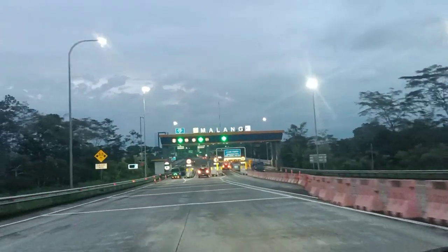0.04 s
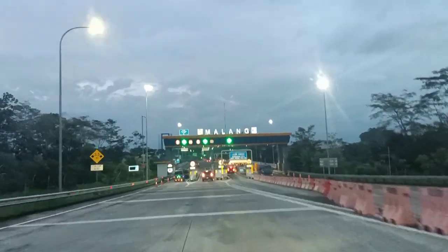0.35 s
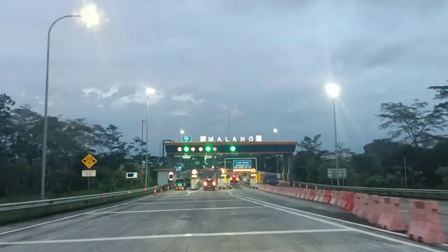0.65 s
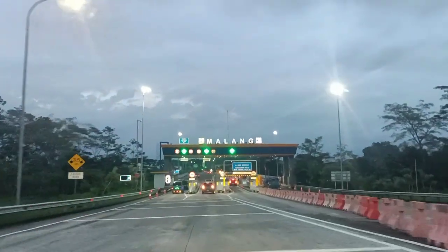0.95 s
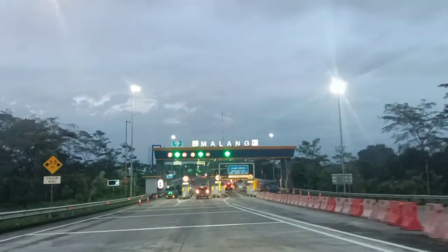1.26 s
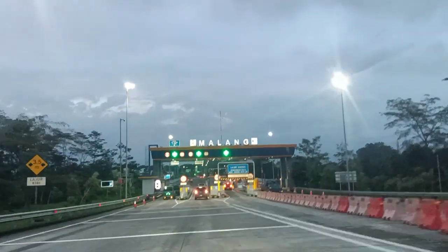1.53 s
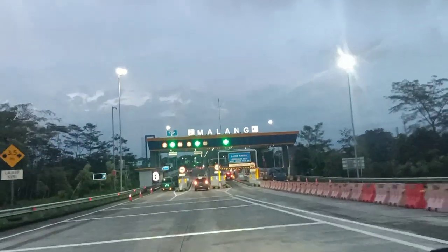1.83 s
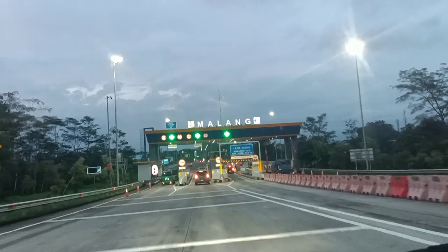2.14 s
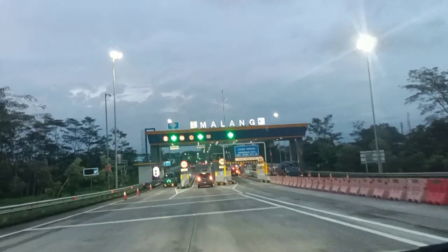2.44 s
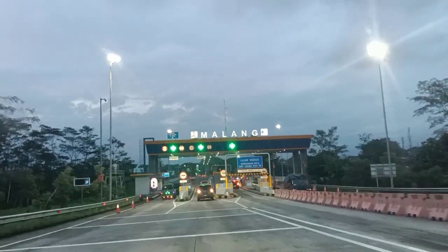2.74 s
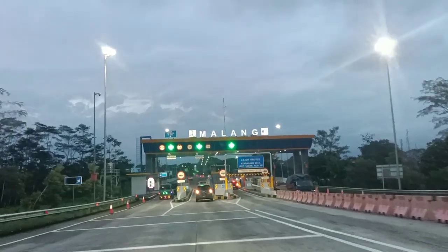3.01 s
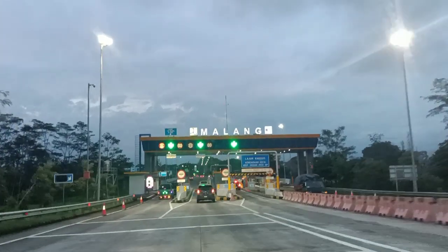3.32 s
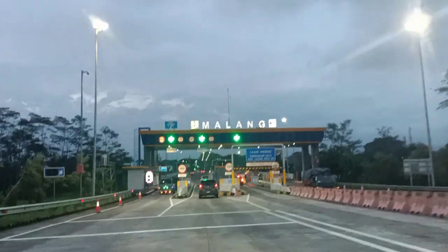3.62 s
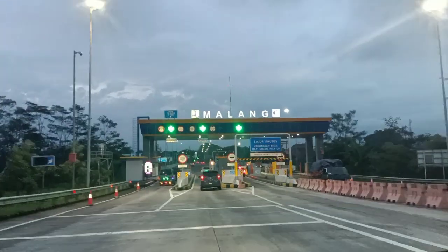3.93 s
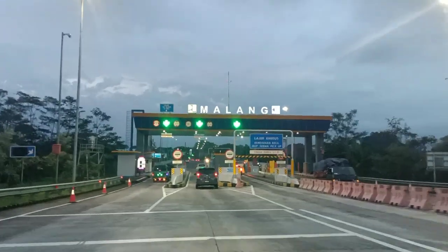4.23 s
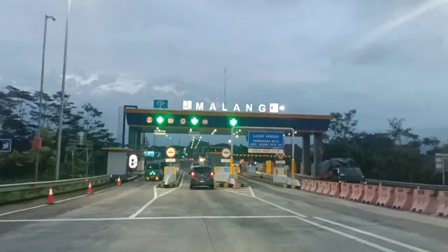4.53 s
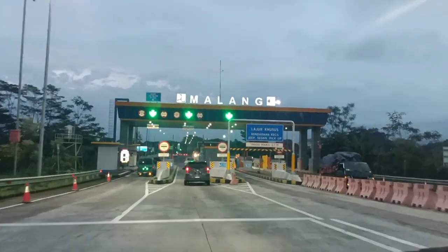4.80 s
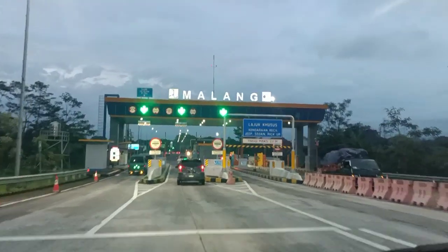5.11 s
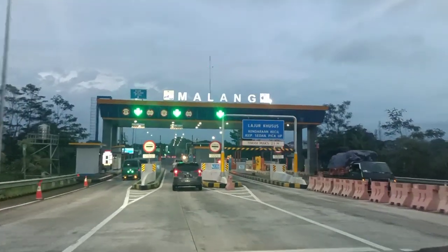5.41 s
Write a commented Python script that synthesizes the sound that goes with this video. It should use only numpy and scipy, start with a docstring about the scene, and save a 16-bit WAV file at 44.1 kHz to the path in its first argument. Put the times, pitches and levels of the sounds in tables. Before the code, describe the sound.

A deep road rumble fills the cabin of a car throughout, easing slightly as it slows, with a faint tyre hum sinking in pitch. The tyres cross sets of raised strips, front wheels then rear, each axle making a quick burst of about three dull, heavy thumps. These pairs come at about 0.4 and 0.7 seconds, 1.7 and 2.1, 3.1 and 3.4, then 4.3 and 4.7. One lighter burst follows at about 5.4 seconds. Every crossing booms through the body and sets loose plastic trim clacking and chattering close to the microphone. The rear wheel crossings add a brief, brighter rattle of small loose things. Between the jolts the rumble carries on with faint ticks from the trim, and a very faint drivetrain whine comes and goes from around 3 to 5 seconds.

```python
"""Car crossing raised strips

Inside a car slowing on concrete, the road rumbles, the tread hums lower and lower, the drivetrain
whines faintly and the trim ticks. Front axle, then rear, crosses sets of three raised strips.
The tyres slap the strips, heave the body, thud in the floor pan and drum the cabin air.
Each crossing throws loose plastic trim up, to clack and rattle."""
import sys
import numpy as np
from scipy import signal
from scipy.fft import rfft, irfft, next_fast_len
from scipy.io import wavfile
from scipy.ndimage import uniform_filter1d, minimum_filter1d, map_coordinates

SR = 44100
rng = np.random.default_rng(int(sys.argv[2]) if len(sys.argv) > 2 else 0)


def store_wav(level_fs):
    """Save 16-bit WAV to argv[1]."""
    pcm = np.round(np.clip(np.atleast_2d(level_fs), -1, 1) * 32767)
    wavfile.write(sys.argv[1], SR, pcm.T.astype(np.int16))


N = 249606
TIME_S = np.arange(N) / SR
AGE_S = np.arange(SR // 2) / SR  # time since a blow


def amp(db):
    """Decibels to gain."""
    return 10 ** (np.asarray(db) / 20)


def unit(x):
    """x at rms 1."""
    return x / np.sqrt(np.mean(x ** 2) + 1e-20)


def along(points, hz):
    """(Hz, value) points read on a log axis."""
    knots_hz, values = np.transpose(points)
    return np.interp(np.log(hz + 1), np.log(knots_hz + 1), values)


def curves(rows):
    """One value per sample for each column after the time."""
    times_s, *columns = np.transpose(rows)
    return [np.interp(TIME_S, times_s, column) for column in columns]


def wobble(per_s):
    """A smooth random curve, per_s knots a second."""
    knots = rng.standard_normal(int(N * per_s / SR) + 4)
    return map_coordinates(knots, [TIME_S * per_s])


def ripple(hz, step_hz):
    """A random curve over frequency, a knot every step_hz."""
    knots = np.arange(0, SR / 2, step_hz)
    return np.interp(hz, knots, rng.standard_normal(len(knots)))


def filtered(x, response):
    """x times a response of frequency."""
    size = next_fast_len(N + SR // 2)
    return irfft(rfft(x, size) * response(np.fft.rfftfreq(size, 1 / SR)), size)[..., :N]


def add(track, start_s, sound):
    """Mix a sound into a track."""
    part = track[..., max(round(start_s * SR), 0):][..., :sound.shape[-1]]
    part += sound[..., :part.shape[-1]]


def swell(rise_s, t60_s):
    """A half-second envelope of peak 1: soft rise, exponential decay."""
    shape = (1 - np.exp(-(AGE_S / rise_s) ** 2)) * amp(-60 * AGE_S / t60_s)
    return shape / shape.max()


def contacts(per_s, spread_db, t60_s):
    """Envelope of rms 1 of many tiny contacts, each dying quickly."""
    hits = (rng.random(N) < per_s / SR) * amp(spread_db * rng.standard_normal(N)) ** 2
    power = signal.fftconvolve(hits, amp(-60 * AGE_S / t60_s) ** 2)[:N]
    return unit(np.sqrt(np.abs(power)))


# Each row: frequency in Hz, left-right correlation.
CORRELATION = [(60, 0.99), (130, 0.96), (290, 0.87), (640, 0.31), (1400, -0.35), (3100, 0.046),
               (15000, -0.086)]


def noise(spectrum):
    """Stereo noise of rms near 1, alike on both sides in the bass, unrelated in the treble."""
    def mid_and_side(hz):
        angle = np.arccos(np.clip(along(CORRELATION, hz), -1, 1)) / 2
        return amp(along(spectrum, hz)) * [np.cos(angle), np.sin(angle)]

    mid, side = filtered(rng.standard_normal((2, N)), mid_and_side)
    return np.array([mid + side, mid - side]) / np.sqrt(np.mean(mid ** 2))


# Each row: time in seconds, then relative shudder, boom, roar and rustle in dB.
ROAD_LEVELS = [(0.19, -24, -31.5, -39.5, -58.5), (1.15, -27.5, -35.5, -43, -65.5),
               (1.55, -24.5, -32.5, -43, -64), (2.52, -26.5, -34.5, -42.5, -62),
               (2.871, -35, -37.5, -42.5, -64), (4.02, -29, -34.3, -46.5, -66.5),
               (5.15, -34, -37.5, -48.5, -69)]
# Lift per crossing in dB: shudder, boom, roar, rustle.
UNSETTLED_LIFT_DB = [6, 6, 3.9, 4.7]


def road_levels():
    """Shudder, boom, roar and rustle in dB: sinking as the car slows, lifted at each crossing."""
    unsettled = np.zeros(N)
    lead_s = 0.051  # rough ground before the strips
    for start_s, *_ in CROSSINGS:
        add(unsettled, start_s - lead_s, swell(rise_s=0.091, t60_s=1.84))
    return [db + lift_db * unsettled for db, lift_db in zip(curves(ROAD_LEVELS), UNSETTLED_LIFT_DB)]


# Each row: frequency in Hz, relative density in dB.
SHUDDER_SPECTRUM = [(12, -23), (22, 0), (29, 7), (38, 2), (52, 1.5), (68, -25), (100, -66.5)]
ROAR_SPECTRUM = [(41, 4), (70, 2.5), (103, -4), (135, 0.5), (165, -3), (211, -1.5), (259, -11.5),
                 (294, -11), (411, -22), (467, -19.5), (524, -20), (566, -26.5), (842, -36), (1050, -34.5),
                 (1500, -50), (1950, -68), (3300, -120)]


def road():
    """Rough concrete shudders the body, booms in the cabin and roars through the tyres."""
    shudder_db, boom_db, roar_db, _ = road_levels()
    bumps_db = wobble(per_s=10)
    shudder = amp(shudder_db - 1.5 + bumps_db) * noise(SHUDDER_SPECTRUM)
    rolling = noise(ROAR_SPECTRUM)
    lows = filtered(rolling, lambda hz: 1 / (1 + (hz / 265) ** 8))
    boom = amp(boom_db + 3.26 + bumps_db) * unit(lows)
    roar = amp(roar_db + 0.07 + 0.5 * bumps_db) * unit(rolling - lows)
    return shudder + boom + roar


# Each row: time in seconds, pitch in Hz.
TREAD_PITCH = [(0, 535), (1.2, 467.7), (3, 450.8), (5.66, 441)]


def tread_hum():
    """Unevenly spaced tread blocks make a fuzzy hum that sinks with the speed."""
    hum_hz, = curves(TREAD_PITCH)
    _, _, roar_db, _ = road_levels()
    carrier = np.exp(2j * np.pi * np.cumsum(hum_hz) / SR)
    fuzz = wobble(per_s=24) + 1j * wobble(per_s=24)
    return amp(roar_db - 11) * unit((carrier * fuzz).real)


# Each row: time in seconds, level in dB.
WHINE_LEVELS = [(2.9, -97), (3.25, -65.5), (3.7, -82), (4.1, -70.5), (4.52, -67), (4.9, -88)]


def drivetrain_whine(start_hz=1236, sag_hz_per_s=9.3):
    """The drivetrain whines faintly as the car coasts."""
    whine_db, = curves(WHINE_LEVELS)
    whine_hz = start_hz - sag_hz_per_s * TIME_S + 9 * wobble(per_s=40)
    phase = 2 * np.pi * np.cumsum(whine_hz) / SR
    return amp(whine_db + 2.5 * wobble(per_s=14)) * np.sqrt(2) * np.sin(phase)


# Each row: frequency in Hz, relative density in dB.
RUSTLE_SPECTRUM = [(900, -28), (1500, -2), (1950, 0.5), (2400, 4), (2700, -4), (3100, -0.5), (3800, -6),
                   (5500, -4), (7000, -7.5), (8800, -9.5), (9800, -16), (15500, -19.5)]


def trim_rustle():
    """The running car keeps its trim faintly ticking."""
    *_, rustle_db = road_levels()
    ticks = contacts(per_s=500, spread_db=3.5, t60_s=0.08)
    return amp(rustle_db - 0.5) * ticks * noise(RUSTLE_SPECTRUM)


# Each row: start in seconds, relative level in dB.
PANEL_KNOCKS = [(2.788, -43.5)]
# Each row: frequency in Hz, relative density in dB.
PANEL_SPECTRUM = [(1100, -10), (1700, -8), (2300, 3), (2600, -9), (3100, -12), (4200, -31)]


def panel_knock():
    """A panel gives one short, dull knock."""
    level = np.zeros(N)
    for start_s, db in PANEL_KNOCKS:
        add(level, start_s, amp(db - 4) * swell(rise_s=0.0043, t60_s=0.07))
    return level * noise(PANEL_SPECTRUM)


# Each row: first clack in seconds, relative clack and surge levels in dB, fade per surge in dB.
RATTLES = [(0.428, -20.5, -37, 4), (0.694, -24.5, -39.5, 0.5), (1.771, -19.5, -34.5, 5),
           (2.087, -23.5, -37, 3), (3.111, -24.5, -40, 5), (3.455, -26, -35, 10), (4.313, -24, -42.5, 4),
           (4.692, -21.5, -36.5, 3), (5.396, -30, -43, 0.5)]
FRONT_RATTLES, REAR_RATTLES = RATTLES[::2], RATTLES[1::2]


def jolts(shape, lead_s, gap_s=0.062):
    """Three fading surges per crossing, starting lead_s before its first clack."""
    power = np.zeros(N)
    for start_s, _, surge_db, fade_db in RATTLES:
        for k in range(3):
            surge = amp(surge_db - fade_db * k) * shape
            add(power, start_s + k * gap_s - lead_s, surge ** 2)
    return np.sqrt(power)


# Each row: frequency in Hz, relative density in dB.
SIZZLE_SPECTRUM = [(2000, 6), (4500, -1), (6000, -2), (8500, -4.5), (10000, -2.5), (11300, -3.5),
                   (14200, -7), (15800, -32)]


def rear_sizzle(level_db=-47.5, rise_s=0.04, hold_s=0.15, t60_s=0.17):
    """Small loose things in the back rattle brightly while the rear axle bounces."""
    level = np.zeros(N)
    for start_s, *_ in REAR_RATTLES:
        age_s = TIME_S - start_s
        decay_db = 60 * np.maximum(age_s - hold_s, 0) / t60_s
        level += np.clip(age_s / rise_s, 0, 1) * amp(level_db - decay_db)
    return level * contacts(per_s=450, spread_db=3, t60_s=0.035) * noise(SIZZLE_SPECTRUM)


# Each row: frequency in Hz, relative density in dB.
TRIM_SPECTRUM = [(500, 5.5), (900, -1), (1130, 2), (1600, -4), (2210, 2.5), (3000, 0), (3700, -1.5),
                 (5400, 1.5), (7400, -5), (8800, -6.5), (9900, -15.5), (11000, -9.5), (14200, -18.5),
                 (15800, -21)]


def trim_chatter():
    """Jolted trim chatters after each strip."""
    shaken = jolts(swell(rise_s=0.032, t60_s=0.26), lead_s=0.023)
    ticks = contacts(per_s=700, spread_db=3, t60_s=0.035)
    return amp(-4.5) * shaken * ticks * noise(TRIM_SPECTRUM)


def clack(ring_hz, treble_db):
    """One plastic part strikes: a noise burst with uneven peaks and a resonance at ring_hz."""
    hz = np.fft.rfftfreq(len(AGE_S), 1 / SR)
    uneven_db = 3.8 * ripple(hz, step_hz=150)
    resonance_db = 5 / (1 + ((hz - ring_hz) / (0.12 * ring_hz)) ** 2)
    hardness_db = (treble_db + 25) * np.clip((hz - 3500) / 5000, 0, 1)  # harder is brighter
    colour = amp(along(TRIM_SPECTRUM, hz) + uneven_db + resonance_db + hardness_db)
    burst = irfft(rfft(rng.standard_normal((2, len(AGE_S)))) * colour, len(AGE_S))
    strike = swell(rise_s=0.0005, t60_s=0.049)
    window_echo = amp(-12.5) * swell(rise_s=0.011, t60_s=0.1)
    return unit(burst) * (strike + window_echo)


# Each row: delay in seconds, relative level in dB, ring in Hz, relative treble in dB.
FRONT_BOUNCES = [(0.0, -11.5, 2660, -17.5), (.059, 0, 2400, -22), (.109, -5.5, 2380, -28),
                 (.129, 0, 4700, -27), (.187, -6, 3500, -28)]
REAR_BOUNCES = [(0.0, -5.5, 5130, -17.5), (.063, 1.5, 2080, -22), (.145, -17.5, 4800, -8.5),
                (.211, -15, 2200, -15.5), (.296, -22.5, 2500, -20.5)]
# Each row: start in seconds, relative level in dB, ring in Hz, relative treble in dB.
SINGLE_CLACKS = [(0.2244, -44.5, 3390, -30), (0.5372, -28, 2120, -23), (0.8592, -32.5, 5100, -18),
                 (1.1278, -48.5, 1720, -32), (1.2521, -46, 3170, -30), (1.377, -49, 2250, -31),
                 (1.6114, -48.5, 1780, -23), (2.0437, -43.5, 3120, -30), (2.8729, -44, 2500, -24),
                 (3.1331, -33, 2500, -18), (3.2398, -35.5, 4850, -21), (4.0477, -51.5, 2470, -41),
                 (4.2024, -52, 2270, -24), (4.372, -28.5, 5450, -11.5)]


def trim_clacks():
    """Larger trim parts strike their seats: in one bounce pattern per axle, and singly."""
    out = np.zeros((2, N))
    for rattles, bounces in [(FRONT_RATTLES, FRONT_BOUNCES), (REAR_RATTLES, REAR_BOUNCES)]:
        for start_s, clack_db, *_ in rattles:
            for delay_s, db, ring_hz, treble_db in bounces:
                add(out, start_s + delay_s, amp(clack_db + db - 10.5) * clack(ring_hz, treble_db))
    for start_s, db, ring_hz, treble_db in SINGLE_CLACKS:
        add(out, start_s, amp(db - 4) * clack(ring_hz, treble_db))
    return out


def windscreen(x):
    """Reflections off the nearby glass give each side its own fine peaks and dips."""
    return filtered(x, lambda hz: amp([2.8 * ripple(hz, step_hz=70) for _ in range(2)]))


# Each row: start in seconds, strip gap in seconds, tyre flight in seconds, position of the hardest
# blow (strips 0-2), heave in dB, heave in Hz, thud in dB, drum in dB. Levels are relative.
CROSSINGS = [(0.411, 0.055, 0.032, 0.035, -4, 43.2, -17, -18.5),
             (0.669, 0.072, 0.046, 0.23, -2, 45, -29, -26.5),
             (1.747, 0.06, 0.00727, .7, -8.5, 30, -23.5, -21),
             (2.061, .064, .028, 0.97, -3, 36.4, -19.5, -17),
             (3.089, 0.057, 0.0038, 0.77, -14.5, 38.5, -16.5, -20.5),
             (3.432, 0.061, .022, 0.37, -3.5, 61, -12, -15),
             (4.285, .052, 0.0031, 0.64, -14.5, 38.85, -20, -28),
             (4.667, 0.066, 0.028, 0.33, -0.5, 33.3, -27, -25.5),
             (5.371, 0.06, 0.011, 0.73, -20.5, 53.3, -24, -24)]  # front and rear axle in turn


def strips(fall_db_per_strip=4):
    """Each meeting of an axle with a strip, weaker away from the hardest blow."""
    for start_s, gap_s, flight_s, hardest, *body_response in CROSSINGS:
        for k in range(3):
            meet_s = start_s + k * gap_s
            force_db = -fall_db_per_strip * abs(k - hardest)
            yield meet_s, meet_s + flight_s, force_db, *body_response


# Each row: frequency in Hz, relative density in dB.
SLAP_SPECTRUM = [(140, -34), (240, 1.5), (293, -12.5), (330, -7.5), (460, -6), (647, -19.5), (747, -14),
                 (855, -21), (1600, -27), (2080, -39), (3520, -120)]


def tread_slaps():
    """The tread slaps each strip and smacks down behind it: dull bursts through the wheel arches."""
    rolling = amp(2) * jolts(swell(rise_s=0.027, t60_s=0.33), lead_s=0.038)
    smack = swell(rise_s=0.0058, t60_s=0.08)
    landing = np.zeros(N)
    for _, land_s, force_db, _, _, thud_db, _ in strips():
        add(landing, land_s, amp(thud_db + force_db - 13.5) * smack)
    return np.hypot(rolling, landing) * noise(SLAP_SPECTRUM)


def ring(modes, rise_s, pitch_scatter, skew_rad):
    """Modes struck once, peak 1, with random strength, detuning and left-right phase."""
    out = np.zeros((2, len(AGE_S)))
    for hz, db, t60_s in modes:
        strength, detune, skew = rng.standard_normal(3)
        phase = 2 * np.pi * hz * (1 + pitch_scatter * detune) * AGE_S
        side_phase = skew_rad * skew * np.array([[1], [-1]])
        out += amp(db + 2 * strength) * swell(rise_s, t60_s) * np.sin(phase + side_phase)
    return out / np.abs(out).max()


# Each row: frequency in Hz, relative level in dB, t60 in seconds.
FLOOR_PAN_MODES = [(79, -7, 0.17), (95.1, 0.5, 0.077), (141, -3.5, 0.23)]
CABIN_AIR_MODES = [(161.8, 0, 0.32), (185.6, 6, 0.19), (216.3, -4, 0.19), (278.8, -12, 0.16)]


def strip_thumps(shake_hz=28):
    """A tyre meets a strip, then lands harder; both blows heave the body and ring floor pan and air."""
    out = np.zeros((2, N))
    shake = amp(-13) * swell(rise_s=0.017, t60_s=0.71) * np.sin(2 * np.pi * shake_hz * AGE_S)
    for meet_s, land_s, force_db, heave_db, heave_hz, thud_db, drum_db in strips():
        heave = swell(rise_s=0.032, t60_s=0.067) * np.sin(2 * np.pi * heave_hz * AGE_S) + shake
        for blow_s, knock_db, lift_db in [(meet_s, -9.5, -5.5), (land_s, 0, 0)]:
            thud = ring(FLOOR_PAN_MODES, rise_s=0.0093, pitch_scatter=0.067, skew_rad=0.074)
            drum = ring(CABIN_AIR_MODES, rise_s=0.0077, pitch_scatter=0.017, skew_rad=0.062)
            knock = amp(thud_db + 8) * thud + amp(drum_db + 4) * drum
            blow = amp(knock_db) * knock - amp(heave_db + lift_db - 0.5) * heave
            add(out, blow_s, amp(force_db) * blow)
    return out


# Each row: frequency in Hz, left minus right in dB.
BALANCE = [(60, 0), (100, -0.5), (160, -5.5), (270, -10), (450, -7), (740, -9), (1200, -3), (2000, -2.5),
           (3300, -2.5), (5500, 3), (9000, -1.5), (15000, 5)]


def cabin_balance(hz):
    """Left and right gains; the low middle is stronger on the right."""
    gains = amp(along(BALANCE, hz) * np.array([[0.5], [-0.5]]))
    return gains / gains.mean(axis=0)


def scene():
    """All sources in the cabin; the rattles also reflect off the glass."""
    rattles = windscreen(trim_chatter() + trim_clacks() + rear_sizzle() + panel_knock() + trim_rustle())
    cabin = strip_thumps() + tread_slaps() + rattles + road() + tread_hum() + drivetrain_whine()
    return filtered(cabin, cabin_balance)


def record(dry, low_cut_hz=16, ceiling=0.86, top_hz=15600):
    """Bass roll-off, a limiter on the hardest thumps, soft ends and a band limit."""
    x = filtered(dry, lambda hz: hz ** 2 / np.sqrt(hz ** 4 + low_cut_hz ** 4))
    needed_gain = np.minimum(1, ceiling / (np.abs(x).max(axis=0) + 1e-9))
    gain = uniform_filter1d(minimum_filter1d(needed_gain, size=900), size=900)
    soft_ends = signal.windows.tukey(N, 0.002)
    return filtered(x * gain * soft_ends, lambda hz: hz < top_hz)


dry = scene()
out = record(dry)
store_wav(out)
```